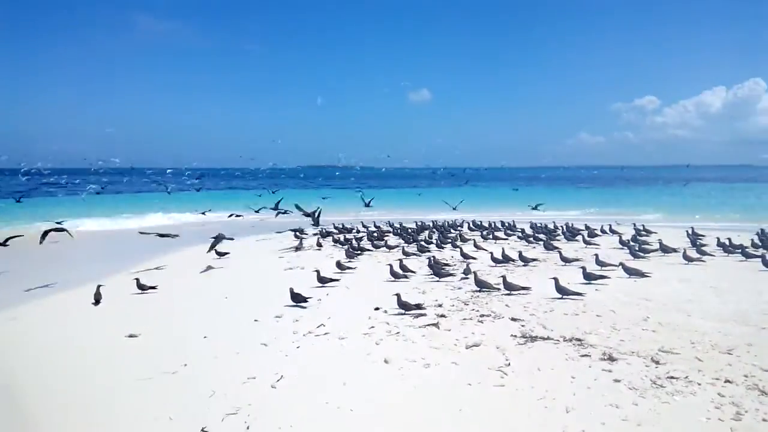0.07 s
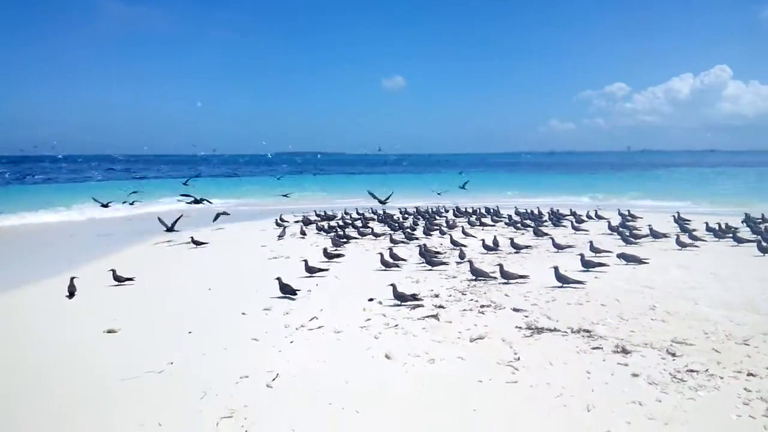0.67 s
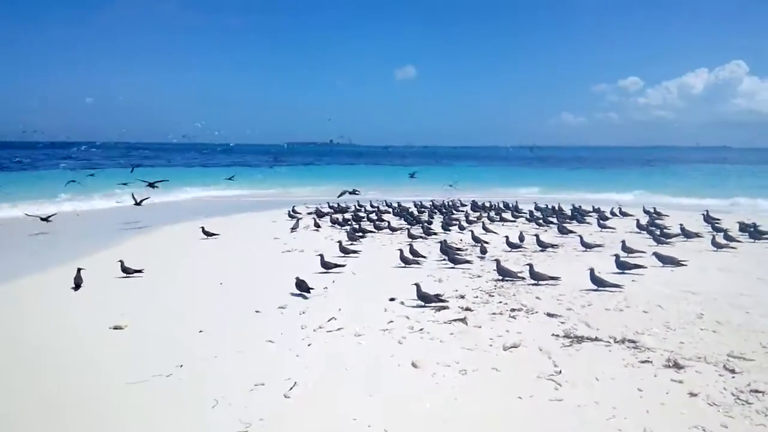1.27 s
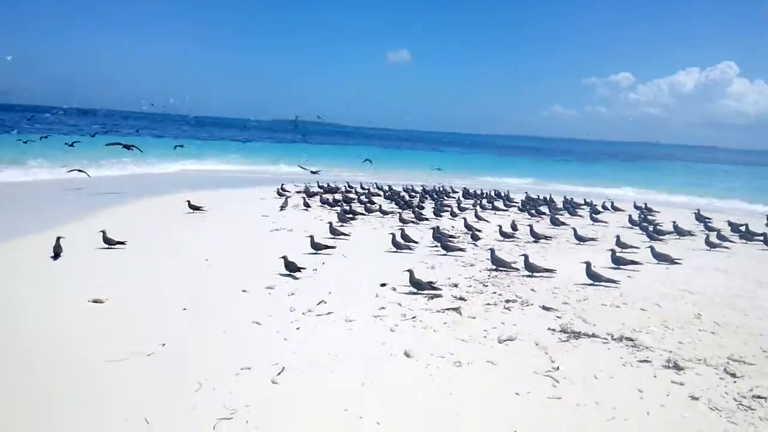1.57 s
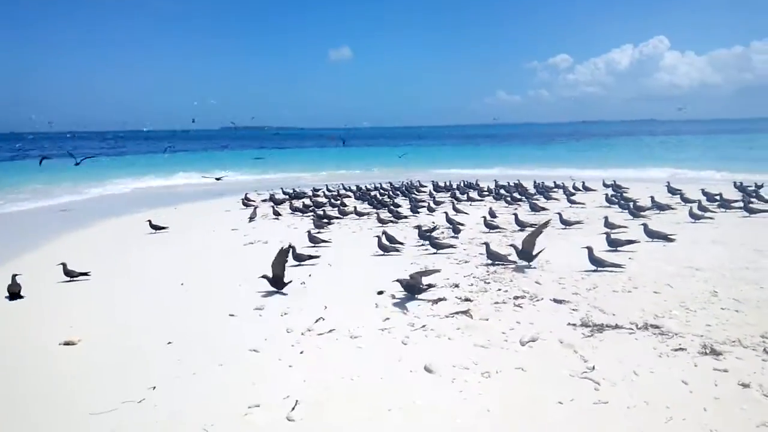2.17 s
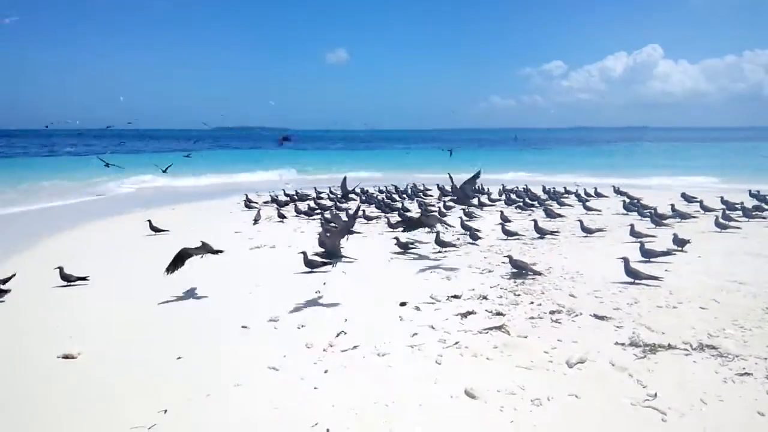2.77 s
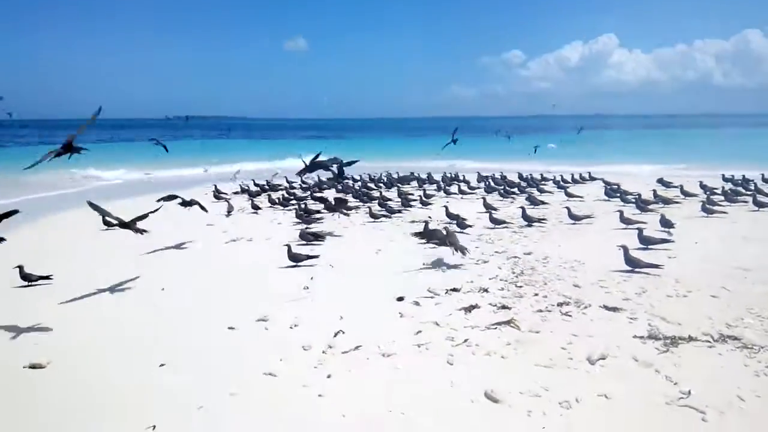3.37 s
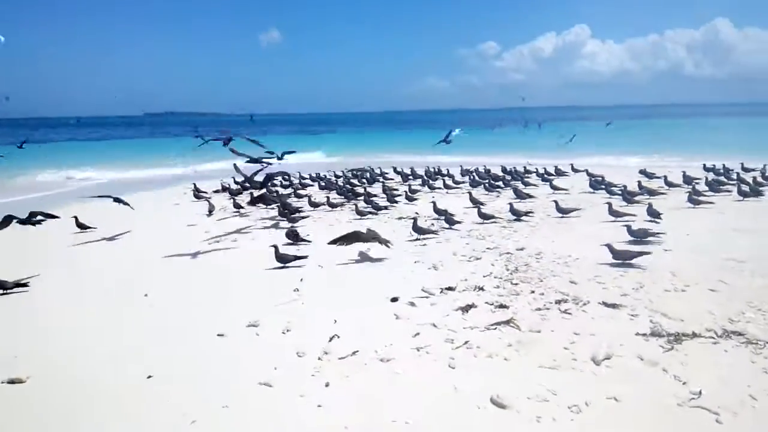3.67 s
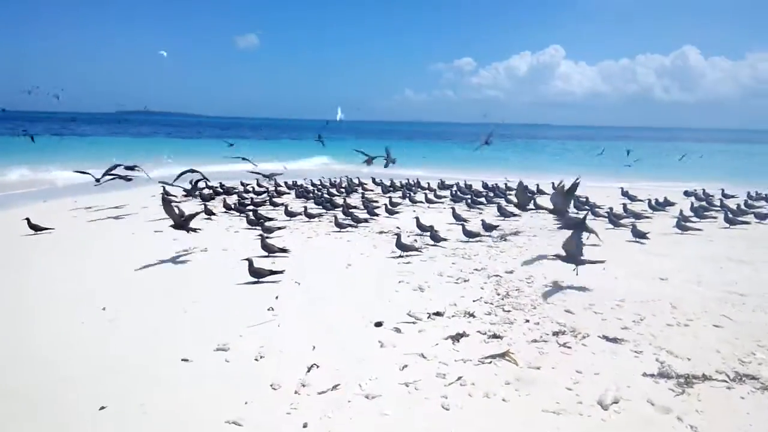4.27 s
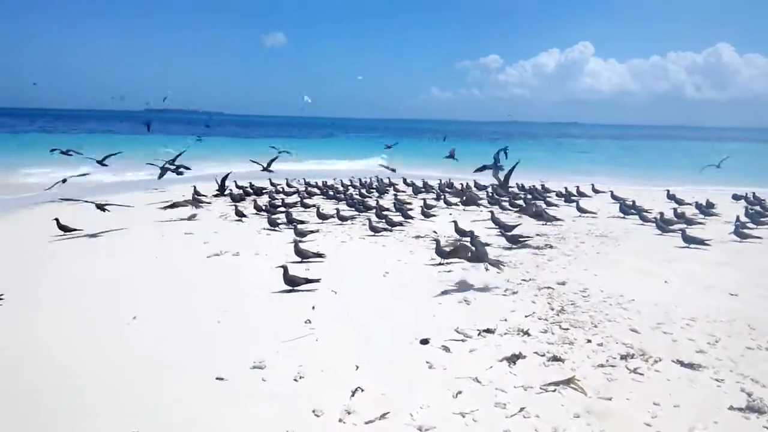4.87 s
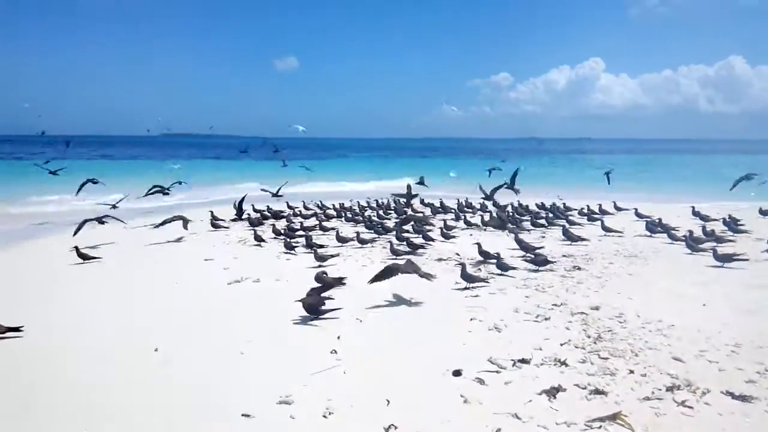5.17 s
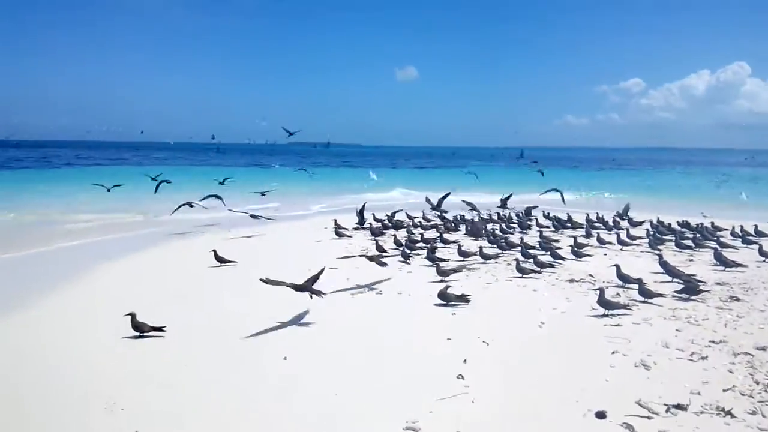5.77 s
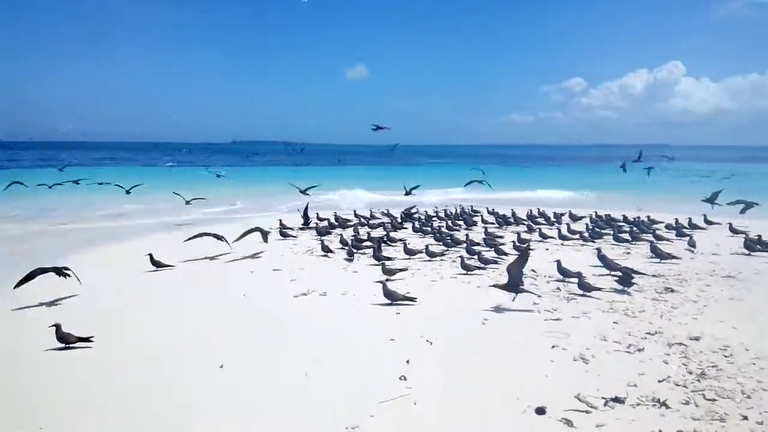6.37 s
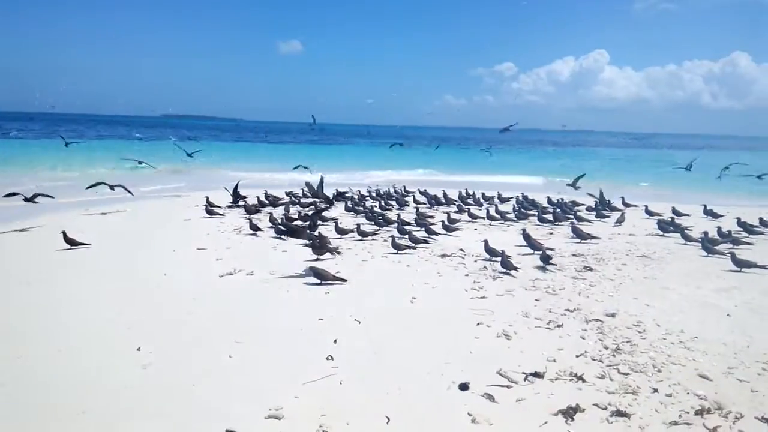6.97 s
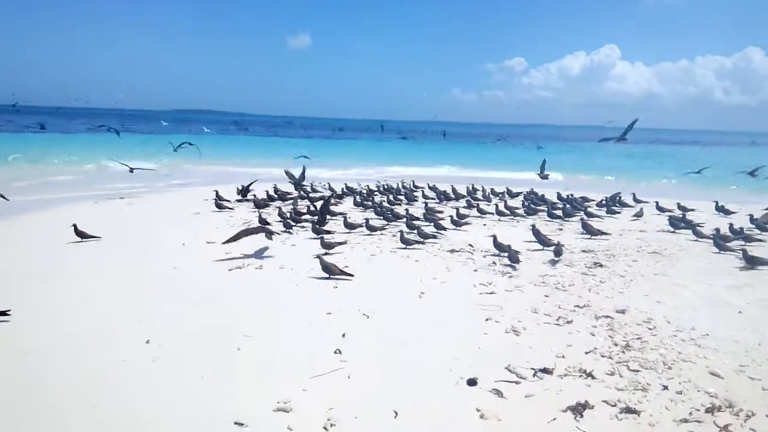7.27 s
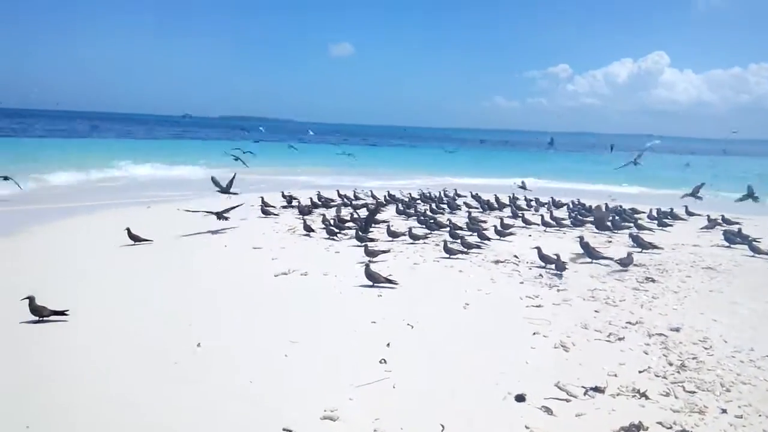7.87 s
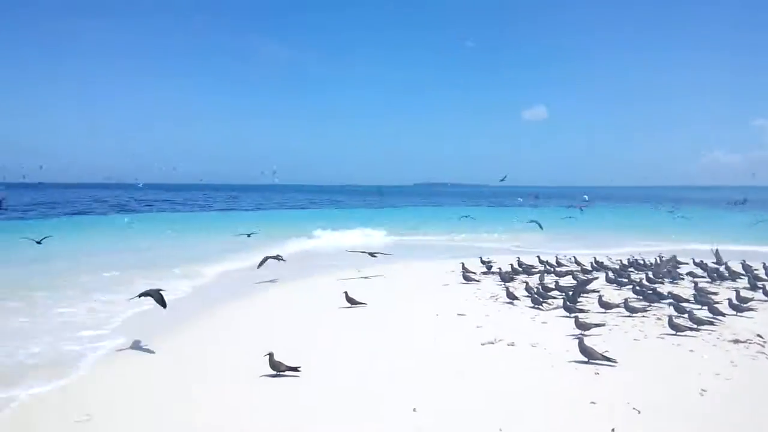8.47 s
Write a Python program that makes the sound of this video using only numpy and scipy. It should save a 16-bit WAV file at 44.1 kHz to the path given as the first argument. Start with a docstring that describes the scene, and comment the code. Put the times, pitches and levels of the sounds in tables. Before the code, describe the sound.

Hundreds of terns chatter without a break on a beach. The nearest birds, almost straight ahead, add short falling yelps, pips, quick stutters, harsh rasps and longer cries that end in a croak. Low surf washes and hisses underneath, gently rising and falling. Gusts of wind buffet the left side of a hand-held stereo microphone, growing stronger after about two seconds, with rumbles and brief thumps.

```python
"""A sandbar with a colony of terns. The nearest birds give long cries, falling yelps, quick stutters,
arched pips and harsh rasps, each an oscillation of the syrinx, over the blended calls of hundreds
further off. Low surf washes up the beach and its foam hisses, both as broadband noise. Turbulent
gusts buffet the left port of a hand-held stereo microphone and only now and then reach the right."""
import sys
import numpy as np
from scipy import signal
from scipy.fft import rfft, irfft, next_fast_len
from scipy.io import wavfile

SR = 44100
rng = np.random.default_rng(int(sys.argv[2]) if len(sys.argv) > 2 else 0)


def digitize_waveform(pressure):
    """Quantize a signal to 16-bit integers and store it at the path in sys.argv[1].

    Rows of a 2-D input are taken as channels; values are limited to [-1, 1].
    """
    field = np.atleast_2d(pressure).T
    bounded = np.clip(field, -1, 1)
    quanta = np.round(bounded * 32767).astype(np.int16)
    wavfile.write(sys.argv[1], SR, quanta)


N = 380141
TIME = np.arange(N) / SR

# Levels are relative within each table. Bearing runs from -1 (right) to 1 (left).
# chatter of the whole colony: time_s, level_db
COLONY_LEVEL = [(0, -40), (.67, -42.5), (1.25, -39), (2.16, -39.5), (3.3, -41), (3.84, -40), (4.6, -42),
                (6.1, -41.5), (6.53, -39), (6.94, -41.5), (7.3, -40.5), (8.04, -44.5), (8.25, -42.5),
                (8.62, -35.5)]
# resonances of a tern's throat and beak: frequency_hz, gain_db
THROAT_RESPONSE = [(700, -54), (1500, -12), (2200, 5.5), (3050, 16), (3800, 10.5), (5000, 11), (6400, 9),
                   (7800, -6), (10000, -38), (15000, -41)]
# air hissing through a shrill call: frequency_hz, density_db
BREATH_SPECTRUM = [(3000, -24), (6500, -7), (9200, 3), (11000, -12), (15000, -21)]

# rise and fall of the surf: time_s, wash_db, foam_db
SURF_LEVELS = [(0, -37.5, -36), (.28, -37, -36), (.55, -40.5, -41.5), (1.4, -40, -41.5), (2.25, -43, -44.5),
               (3.7, -40.5, -43.5), (4.2, -40.5, -43), (4.55, -40.5, -39.5), (5.4, -36, -37.5),
               (6.5, -37, -38.5), (7.8, -40, -41), (8.6, -37.5, -40.5)]
# spectra of the wash, the foam and the spray: frequency_hz, density_db
WASH_SPECTRUM = [(25, -4), (70, -3.5), (200, -6), (400, -1), (700, 1), (1000, 0), (1500, -1), (2500, -5.5),
                 (4000, -25), (7000, -29.5), (15000, -57.5)]
FOAM_SPECTRUM = [(500, -24), (2000, -18), (3000, 5), (4500, 10), (6400, 7), (7900, -7), (10000, -11.5),
                 (12500, -30), (15000, -32)]
SPRAY_SPECTRUM = [(5000, -32), (8500, 0), (12000, -1), (15000, -12)]
# parts of the wash common to both ports and unrelated between them: frequency_hz, gain_db
WASH_COHERENT = [(60, -5.5), (250, 2.5), (1300, -5), (2200, -5), (4000, -37)]
WASH_DIFFUSE = [(60, -7), (250, -7), (1300, -9), (2200, -1.5), (4000, 11)]

# turbulence before its treble roll-off: frequency_hz, density_db
TURBULENCE_SPECTRUM = [(20, -14), (38, -19), (55, -8), (85, -0.5), (130, 1.5), (250, -1), (500, -5),
                       (1000, -11.5), (2000, -16.5)]
# treble roll-off, set by eddy size as the wind's angle to the port changes: time_s, corner_hz
EDDY_ROLLOFF = [(0, 294), (1.7, 326), (2.1, 448), (2.7, 403), (3.3, 370), (4.2, 327), (5.2, 266),
                (6.6, 348), (7.6, 264), (8.6, 280)]
# breeze on the left port between gusts: time_s, level_db
BREEZE_LEVEL = [(0, -42), (.19, -47.5), (.33, -27.5), (.44, -28.5), (.56, -37.5), (.72, -29), (1.1, -32.5),
                (1.27, -37), (1.42, -39.5), (1.6, -35), (1.91, -36), (2.0, -29), (2.19, -31), (3.0, -27),
                (3.5, -22), (3.65, -30), (3.85, -20.5), (4.3, -28.5), (4.47, -25), (4.67, -31.5),
                (4.92, -25), (5.42, -22), (5.72, -28), (6.03, -28), (6.75, -23), (6.95, -31), (7.17, -26.5),
                (7.6, -24.5), (8.15, -24.5), (8.5, -31.5)]
# gusts on the left port, and puffs that spill round to the right: start_s, length_s, level_db
LEFT_GUSTS = [(.595, 0.094, -24), (1.2, 0.014, -29), (1.322, 0.02, -25), (1.655, 0.076, -28),
              (2.015, 0.016, -22.5), (2.055, 0.025, -19.5), (2.11, 0.015, -24.5), (2.235, 0.044, -20),
              (2.3, .11, -24.5), (2.45, 0.066, -25.5), (2.52, 0.18, -21.5), (2.705, 0.19, -19),
              (2.93, 0.016, -21), (3.06, 0.037, -24), (3.17, 0.095, -15.5), (3.305, 0.05, -15.5),
              (3.39, 0.079, -21), (3.455, 0.012, -30), (3.822, 0.091, -22.5), (3.96, 0.044, -43),
              (4.135, 0.16, -21), (4.495, 0.031, -21.5), (5.012, 0.018, -19.5), (5.08, 0.3, -19),
              (5.575, 0.067, -20.5), (5.75, 0.025, -23), (6.2, 0.079, -27.5), (6.49, 0.19, -26.5),
              (7.33, 0.26, -26), (8.05, 0.086, -24)]
RIGHT_PUFFS = [(5.1, 0.034, -36), (5.17, 0.05, -36), (6.94, 0.032, -39), (7.03, .02, -43),
               (7.14, 0.024, -33), (7.24, 0.01, -41), (7.35, 0.018, -40)]
# single eddies that strike the left port: start_s, level_db
EDDY_STRIKES = [(2.083, -11), (2.243, -29), (2.376, -16), (2.53, -12), (2.602, -12), (2.72, -12),
                (2.753, -9), (2.781, -10.5), (2.812, -13.5), (2.848, -17), (3.174, -11), (3.235, -7.5),
                (3.281, -12), (3.348, -10), (3.429, -15.5), (3.856, -15), (4.145, -9.5), (4.233, -13),
                (4.523, -20), (5.264, -8), (5.359, -12.5), (6.499, -18), (7.263, -14.5), (7.35, -17.5)]

# response of the small ports to a nearby whistle: frequency_hz, gain_db
PORT_RESPONSE = [(1000, -6), (6600, -1.5), (7800, -8.5), (11000, 12), (15000, -2)]
# falling yelps: start_s, length_s, start_hz, end_hz, fundamental_db, octave_db, bearing
NEAR_YELPS = [(.355, .022, 3250, 2950, -35, -56, .2), (.42, 0.026, 3740, 3250, -43, -54, -.2),
              (.458, 0.018, 3200, 2900, -44.5, -54, .1), (0.502, .028, 3190, 2550, -41, -54, .1),
              (0.646, .024, 3250, 2380, -47, -54, .1), (.79, 0.023, 3120, 2850, -35, -51, -.2),
              (1.066, .012, 3700, 3400, -36, -56, 0), (1.079, .028, 3170, 2840, -30.5, -40, .1),
              (1.105, .02, 2730, 2500, -36, -55, .4), (1.162, .026, 3160, 2760, -39, -51, .1),
              (1.46, .025, 3870, 3480, -43, -50, -.3), (1.54, 0.031, 3100, 2490, -39, -55, .2),
              (1.804, 0.048, 3160, 2420, -40, -55, .2), (2.382, .027, 2980, 2620, -35, -52, .1),
              (2.975, .025, 3330, 2940, -39, -60, 0), (3.02, .026, 3060, 2620, -35, -59, .1),
              (3.363, 0.035, 3990, 3280, -39.5, -65, 0), (3.469, 0.037, 3480, 2800, -37, -52, .3),
              (3.582, 0.023, 3520, 3060, -36, -46, -.1), (3.977, 0.019, 3260, 2920, -34, -44, 0),
              (4.256, 0.033, 3820, 3060, -35.5, -44, -.1), (4.352, 0.012, 3300, 2980, -44, -53, 0),
              (4.37, 0.013, 3150, 2780, -37, -55, 0), (4.462, 0.016, 3120, 2600, -33.5, -53, .1),
              (4.748, .014, 3050, 2700, -41, -49, .1), (4.8, 0.029, 3280, 2950, -37, -54, -.1),
              (5.374, 0.061, 3590, 2900, -40, -41, 0), (5.399, 0.034, 2930, 2560, -28.5, -43, .2),
              (6.602, 0.024, 3320, 3030, -38, -54, 0), (6.634, 0.023, 3450, 3020, -38, -54, 0),
              (6.7, 0.013, 3320, 3030, -34, -50, 0), (6.73, 0.021, 3010, 2740, -31, -53, .1),
              (6.833, 0.02, 3240, 2960, -44, -58, 0), (6.893, 0.024, 3100, 2900, -32.5, -50, -.1),
              (7.026, 0.025, 2940, 2760, -33, -48, .1), (7.218, 0.026, 3760, 3440, -36, -42.5, -.3),
              (7.425, .035, 3800, 3250, -42, -56, 0), (7.678, 0.026, 3080, 2640, -33, -47, .3),
              (7.918, 0.021, 3630, 3100, -38, -41, .1), (7.934, .05, 3130, 2380, -31, -40, .2),
              (8.054, 0.049, 3230, 2930, -37, -46, -.4), (8.447, .014, 2920, 2520, -46, -57, 0),
              (8.52, 0.022, 3180, 2750, -34, -48, -.1)]
# arched pips: start_s, length_s, top_hz, fundamental_db, octave_db
NEAR_PIPS = [(0.62, 0.026, 3320, -38, -40.5), (0.688, 0.045, 3250, -39, -53),
             (0.942, 0.039, 3380, -36, -50), (1.073, .012, 2750, -48, -37), (1.255, 0.033, 3230, -35, -57),
             (1.5, 0.023, 2580, -59, -41), (1.822, 0.035, 3290, -35, -59), (2.482, 0.027, 3110, -44, -48),
             (2.701, 0.044, 3070, -36, -39.5), (2.771, 0.045, 3000, -52, -45),
             (2.898, 0.032, 2980, -50, -40), (2.91, .033, 2460, -55, -43), (2.962, 0.025, 2550, -50, -45),
             (3.0, 0.028, 2540, -52, -45), (3.75, 0.053, 3020, -33, -66), (3.903, 0.037, 3010, -36, -39),
             (4.005, 0.036, 3280, -36, -46), (4.4, 0.058, 3070, -39, -47), (4.518, 0.025, 2990, -52, -45),
             (4.772, 0.032, 2800, -37, -56), (4.937, 0.011, 2660, -66, -37), (5.025, 0.045, 3410, -37, -44),
             (5.54, 0.023, 2970, -37, -33.5), (5.844, 0.043, 3290, -33, -52),
             (5.977, 0.04, 3050, -31.5, -40), (6.41, .05, 3680, -37, -50), (6.436, 0.04, 3060, -33, -62),
             (6.952, 0.057, 3250, -38.5, -58), (7.122, .047, 3240, -39, -45),
             (7.248, 0.024, 2600, -72, -35.5), (7.284, 0.027, 2560, -59, -36),
             (7.49, 0.052, 3060, -36.5, -61), (7.563, 0.09, 3580, -38, -61), (8.257, 0.034, 3130, -35, -43),
             (8.393, 0.035, 3050, -36, -46.5), (8.402, .016, 2600, -55, -36)]
# final pitch of a pip, which falls further in the low ones: top_hz, end_ratio
PIP_ENDINGS = [(2580, 0.87), (3000, .935)]
# harsh calls: start_s, length_s, start_hz, end_hz, level_db, rolloff_exponent (negative is shrill)
NEAR_RASPS = [(1.005, .075, 3380, 3660, -40.5, -0.5), (1.055, 0.09, 3260, 2980, -37, -2),
              (1.42, 0.085, 3480, 3210, -39, -2), (2.94, 0.085, 3350, 3180, -43.5, -2),
              (2.354, 0.066, 3150, 3390, -37, 0), (2.614, 0.12, 3830, 4180, -35.5, 1),
              (3.293, 0.058, 3760, 4070, -37.5, 0.37), (3.474, 0.072, 3130, 3420, -40, -2.5),
              (3.679, 0.14, 3800, 4350, -41, -1), (3.892, 0.093, 3120, 3270, -34.5, -1),
              (5.374, 0.093, 3650, 2716, -29.5, -1), (5.475, 0.082, 3440, 3390, -34.5, -2.5),
              (6.362, 0.082, 3320, 3560, -33.5, -0.5), (7.051, 0.055, 4300, 4080, -39, 4),
              (7.41, 0.088, 3920, 4280, -40, 3), (8.271, 0.054, 3150, 2890, -36.5, -1.5),
              (8.385, 0.044, 3300, 3010, -38, -1.2)]
# long cries: start_s, length_s, start_hz, end_hz, fundamental_db, octave_db, croak_db
NEAR_CRIES = [(1.311, .066, 3370, 2330, -35, -44, -39), (2.539, 0.083, 3350, 2314, -32.5, -42.5, -44),
              (3.611, 0.074, 3430, 2314, -32, -52, -39), (5.867, 0.05, 3250, 2330, -33.5, -43, -51),
              (6.283, .06, 3310, 2400, -32, -49, -39), (7.334, .068, 3420, 2340, -32.5, -58, -42),
              (8.227, 0.066, 3410, 2385, -32, -49, -40.5)]
# overtones of the croak that ends a cry: harmonic_number, level_db
CROAK_HARMONICS = [(2, -3), (3, 0), (4, -15), (5, -1), (6, -10)]
# runs of tiny yelps: start_s, length_s, first_hz, level_db
NEAR_STUTTERS = [(3.914, .06, 3600, -37.5), (4.958, .06, 3380, -31), (5.757, .082, 3500, -32.5)]

PORT_LAG_S = .00041  # delay between the ports for a sound from one side
NEAR_SPREAD = .15  # scale of the near birds' random bearings, almost straight ahead


def amp(db):
    """Decibels to amplitude ratio."""
    return 10 ** (np.asarray(db) / 20)


def unit(x):
    """Scale to rms 1."""
    return x / np.sqrt(np.mean(x ** 2) + 1e-18)


def curves(table):
    """Each column of a table, interpolated linearly in time."""
    times, *columns = np.transpose(table)
    return [np.interp(TIME, times, column) for column in columns]


def gain_at(response, hz):
    """Gain of a frequency response at the given frequencies."""
    knots_hz, db = np.transpose(response)
    return amp(np.interp(np.log(hz + 1e-3), np.log(knots_hz), db))


def colour(x, response):
    """Zero-phase filtering: multiply the spectrum by a frequency response."""
    size = next_fast_len(x.shape[-1] + 512, real=True)
    gain = gain_at(response, np.fft.rfftfreq(size, 1 / SR))
    return irfft(rfft(x, size) * gain, size)[..., :x.shape[-1]]


def walk(rate_hz, size=N):
    """Random fluctuation with spread near 1, changing course rate_hz times a second."""
    place = np.arange(size) * rate_hz / SR + rng.random()
    knots = rng.standard_normal(int(place[-1]) + 2)
    return np.interp(place, np.arange(len(knots)), knots) * np.sqrt(3 / 2)


def swell(size, edge):
    """Envelope with quarter-sine flanks, each a share edge of its length."""
    u = np.linspace(0, 1, size)
    return np.sin(np.pi / 2 * np.minimum(np.minimum(u, 1 - u) / edge, 1))


def add(out, x, start_s, bearing):
    """Mix a sound in with a time difference of arrival: the nearer port receives it first."""
    for port, lead in zip(out, (bearing, -bearing)):
        start = max(int((start_s - lead * PORT_LAG_S / 2) * SR), 0)
        part = port[start:start + len(x)]
        part += x[:len(part)]


def whistle(length_s, pitches_hz, db, octave_db, third_db=-28, crack=.46, flicker_db=2):
    """Period tripling: as a hoarse whistle falls, it gains sidebands at thirds of its pitch."""
    size = int(length_s * SR)
    arc = np.polyfit([0, .5, 1], pitches_hz, 2)
    hz = np.polyval(arc, np.linspace(0, 1, size))
    jitter = 1 + .014 * walk(1500, size) + .007 * walk(120, size)
    phase = 2 * np.pi * np.cumsum(hz * jitter) / SR
    overtones = np.sin(2 * phase) + amp(third_db) * np.sin(3 * phase)
    tone = amp(db) * np.sin(phase) + amp(octave_db + flicker_db * walk(170, size)) * overtones
    slack = np.clip((pitches_hz[0] - hz) / pitches_hz[0] * 3, 0, 1) ** 3
    hoarse = 1 + .15 * walk(200, size) + .24 * walk(1800, size)
    return tone * (1 + crack * slack * np.cos(phase / 3)) * hoarse * swell(size, .1)


def far_yelps(count=950, pitch_hz=2990, scatter_db=2, octave_db=-8):
    """Incoherent sum of short chirps, each with its own pitch, fall, level and bearing."""
    out = np.zeros((2, N))
    birds = zip(rng.random((count, 4)), rng.standard_normal((count, 3)))
    for (when, span, fall, side), (pitch, near, bright) in birds:
        arc_hz = pitch_hz * np.exp(.125 * pitch) * np.array([1.02 + .06 * fall, 1, .95 - .08 * fall])
        db = scatter_db * min(near, 1)
        call = whistle(.009 + .02 * span ** 2, arc_hz, db, db + octave_db + 3 * min(bright, 1))
        add(out, call, when * N / SR, 2 * side - 1)
    return unit(colour(out, THROAT_RESPONSE))


def rasp(length_s, start_hz, end_hz, rolloff, grain=.3, focus=0, jitter=.045, hiss_db=-32):
    """Source and filter: the syrinx beats unevenly at a quarter of the pitch; the throat resonates."""
    size = int(length_s * SR)
    beat_hz = np.linspace(start_hz, end_hz, size) / 4
    phase = 2 * np.pi * np.cumsum(beat_hz * (1 + jitter * walk(700, size))) / SR
    orders = np.arange(2, 11)[:, None]
    weights = gain_at(THROAT_RESPONSE, orders * beat_hz.mean()) / np.maximum(orders / 4, 1) ** rolloff
    weights /= 1 + focus * np.abs(orders - 4)  # focus favours the fourth harmonic
    partials = weights * np.sin(orders * phase + rng.uniform(0, 2 * np.pi, orders.shape))
    breath = unit(colour(rng.standard_normal(size), BREATH_SPECTRUM))
    voice = unit(partials.sum(0)) + amp(hiss_db - 6 * rolloff) * breath  # shrill calls hiss more
    rattle = np.exp(grain * walk(400, size))
    return unit(voice * rattle) * swell(size, .25)


def far_rasps(count=420, pitch_hz=2950, scatter_db=2):
    """Squabbles all over the colony; distance attenuates their upper harmonics."""
    out = np.zeros((2, N))
    birds = zip(rng.random((count, 3)), rng.standard_normal((count, 3)))
    for k, ((when, span, side), (pitch, glide, near)) in enumerate(birds):
        hz = pitch_hz * np.exp(.12 * pitch)
        call = rasp(.0488 + .0797 * span, hz, hz * np.exp(.08 * glide), rolloff=1.6, grain=.098)
        add(out, amp(scatter_db * min(near, 1)) * call, (k + when - 2) / count * N / SR, 2 * side - 1)
    return unit(out)


def colony(yelps_db=-.5, rasps_db=.3):
    """Superposition: hundreds of distant calls blend into a chatter that swells and ebbs."""
    level_db, = curves(COLONY_LEVEL)
    return amp(level_db) * (amp(yelps_db) * far_yelps() + amp(rasps_db) * far_rasps())


def surf(wash_db=2, foam_db=-1, spray_db=-20, churn_db=1.5, fizz_db=2, lag_s=.00027):
    """Partial coherence: the wash arrives as one front, diffuse in the treble, under foam and spray."""
    wash_level, foam_level = curves(SURF_LEVELS)
    front = colour(rng.standard_normal(N) * amp(churn_db * walk(10)), WASH_COHERENT)
    diffuse = colour(rng.standard_normal((2, N)), WASH_DIFFUSE)
    wash = colour(np.array([np.roll(front, int(lag_s * SR)), front]) + diffuse, WASH_SPECTRUM)
    foam = colour(rng.standard_normal((2, N)) * amp(fizz_db * walk(900) + .83 * walk(16)), FOAM_SPECTRUM)
    spray = colour(rng.standard_normal((2, N)), SPRAY_SPECTRUM)
    surge_db = foam_level - foam_level.max()  # spray dies away twice as fast as the foam
    hiss = amp(foam_level) * (amp(foam_db) * unit(foam) + amp(spray_db + surge_db) * unit(spray))
    hiss_balance = amp([[0], [-3.5]])
    return amp(wash_level + wash_db) * unit(wash) + hiss * hiss_balance


def turbulence(force, sharpen=.28):
    """Turbulent pressure on one port: harder gusts have smaller eddies, so the rumble reaches higher."""
    force_db = 20 * np.log10(force) + 1.5 * walk(110)
    corner_hz, = curves(EDDY_ROLLOFF)
    corner_hz *= amp(sharpen * (force_db + 25) + 1.2 * walk(200))
    size = next_fast_len(N, real=True)
    hz = np.fft.rfftfreq(size, 1 / SR)
    spectrum = rfft(rng.standard_normal(size)) * gain_at(TURBULENCE_SPECTRUM, hz)
    centres_hz = np.geomspace(25, 2000, 10)
    spacing = np.log(centres_hz[1] / centres_hz[0])
    rumble = np.zeros(N)
    for centre_hz in centres_hz:
        band = np.maximum(1 - np.abs(np.log((hz + 1) / centre_hz)) / spacing, 0)
        rumble += irfft(spectrum * band, size)[:N] * np.exp(-centre_hz / corner_hz)
    return unit(rumble) * amp(force_db)


def wind(gain_db=4, lee_db=-50, flutter_db=1, eddy_db=-6, eddy_s=.0083, slap_db=-2):
    """Flow noise: breeze, gusts and eddies windward (left); faint rumble and puffs in the lee."""
    breeze_db, = curves(BREEZE_LEVEL)
    left = np.sqrt(amp(breeze_db) ** 2 + gust_power(LEFT_GUSTS)) * amp(flutter_db * walk(30))
    right = np.sqrt(amp(lee_db + 2 * walk(4.4)) ** 2 + gust_power(RIGHT_PUFFS))
    slaps = np.zeros((2, N))
    for start_s, db in EDDY_STRIKES:
        eddy = amp(db + eddy_db) * swell(int(eddy_s * SR), .089)
        part = left[int(start_s * SR):][:len(eddy)]
        part[:] = np.maximum(part, eddy)
        add(slaps[:1], amp(db + slap_db) * slap(), start_s, 0)
    return amp(gain_db) * (np.array([turbulence(left), turbulence(right)]) + slaps)


def yelp(length_s, start_hz, end_hz, db, octave_db, halfway_drop=.35):
    """Parabolic glide: a whistle whose pitch drops ever faster."""
    middle_hz = start_hz - halfway_drop * (start_hz - end_hz)
    return whistle(length_s, (start_hz, middle_hz, end_hz), db, octave_db)


def near_yelps():
    """Direct sound of single yelps, each located by its delay between the ports."""
    out = np.zeros((2, N))
    for start_s, *shape, bearing in NEAR_YELPS:
        add(out, yelp(*shape), start_s, bearing)
    return out


def gust_power(table, attack_s=.012, decay_s=.028):
    """Incoherent gusts add in power; each rises, holds and decays exponentially."""
    power = np.zeros(N)
    for start_s, length_s, db in table:
        start = int(start_s * SR)
        t = TIME[:min(N - start, SR)]
        envelope = np.minimum(t / attack_s, 1) * np.exp(-np.maximum(t - length_s, 0) / decay_s)
        power[start:start + len(t)] += (amp(db) * envelope) ** 2
    return power


def near_pips(start_ratio=.97):
    """Frequency modulation in one arch; the low pips squeak on their second harmonic."""
    out = np.zeros((2, N))
    for start_s, length_s, top_hz, db, octave_db in NEAR_PIPS:
        end_ratio = np.interp(top_hz, *np.transpose(PIP_ENDINGS))
        pip = whistle(length_s, top_hz * np.array([start_ratio, 1, end_ratio]), db, octave_db)
        add(out, pip, start_s, NEAR_SPREAD * rng.uniform(-1.2, 1))
    return out


def near_rasps():
    """Roughness: fast, irregular amplitude modulation makes these close calls harsh."""
    out = np.zeros((2, N))
    for start_s, length_s, start_hz, end_hz, db, rolloff in NEAR_RASPS:
        call = rasp(length_s, start_hz, end_hz, rolloff, focus=.85)
        add(out, amp(db) * call, start_s, NEAR_SPREAD * rng.uniform(-1, 1))
    return out


def near_cries(cry_db=5, tail_db=4):
    """Register break: a long falling whistle gives way to a croak."""
    out = np.zeros((2, N))
    for start_s, length_s, start_hz, end_hz, db, octave_db, croak_db in NEAR_CRIES:
        bearing = NEAR_SPREAD * rng.uniform(-1.2, 1)
        add(out, amp(cry_db) * yelp(length_s, start_hz, end_hz, db, octave_db), start_s, bearing)
        add(out, amp(tail_db + croak_db) * croak(end_hz), start_s + .9 * length_s, bearing)
    return out


def croak(whistle_hz, length_s=.0454, sag_ratio=.92):
    """Subharmonic oscillation: the syrinx drops to a third of the whistle's pitch, sags and fades."""
    size = int(length_s * SR)
    u = np.linspace(0, 1, size)
    hz = whistle_hz / 3 * sag_ratio ** np.sqrt(u) * (1 + .02 * walk(800, size))
    phase = 2 * np.pi * np.cumsum(hz) / SR
    harmonics = sum(amp(db + 2 * walk(200, size)) * np.sin(k * phase) for k, db in CROAK_HARMONICS)
    return harmonics * (1 - u / 2) * swell(size, .15)


def slap(width_s=.000358):
    """Pressure transient at an eddy's front: one bipolar swing, the derivative of a Gaussian."""
    u = np.arange(-6, 6, 1 / (width_s * SR))
    return rng.choice([-1, 1]) * u * np.exp((1 - u ** 2) / 2)


def near_stutters(period_s=.0222, note_s=.014, sag_hz_per_s=5300, drop_hz=300, octave_db=-15):
    """Pulsed phonation: an evenly spaced run of tiny yelps that step down in pitch."""
    out = np.zeros((2, N))
    for start_s, length_s, first_hz, db in NEAR_STUTTERS:
        bearing = NEAR_SPREAD * rng.uniform(-2, 1)
        for t in np.arange(0, length_s, period_s):
            hz = first_hz - sag_hz_per_s * t
            add(out, yelp(note_s, hz, hz - drop_hz, db, db + octave_db), start_s + t, bearing)
    return out


def scene():
    """Linear superposition of birds, surf and wind; the birds are a little louder on the left."""
    whistles = near_cries() + amp(4) * near_yelps() + amp(3) * near_pips() + amp(4) * near_stutters()
    birds = colour(whistles, PORT_RESPONSE) + amp(-2.5) * near_rasps() + colony()
    return birds * amp([[1.5], [-1.5]]) + surf() + wind()


def record(dry):
    """Soft saturation rounds off the strongest gusts; a steep low-pass cuts the top."""
    rounded = dry / (1 + dry ** 6) ** (1 / 6)
    lowpass = signal.ellip(8, .2, 80, 15150, fs=SR, output="sos")
    return signal.sosfilt(lowpass, rounded)


dry = scene()
out = record(dry)
digitize_waveform(out)
```